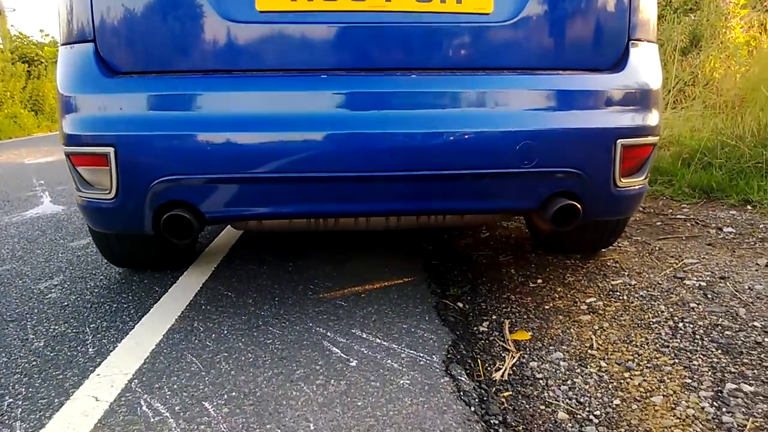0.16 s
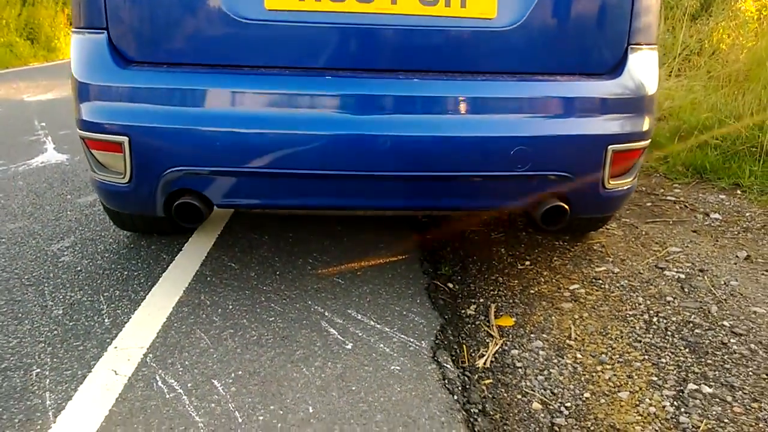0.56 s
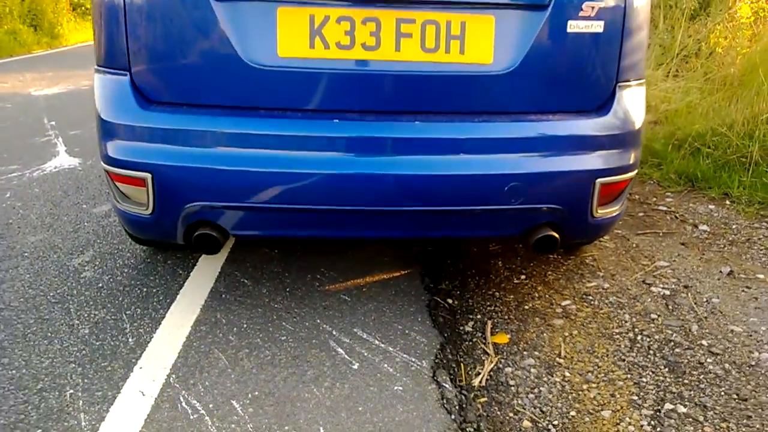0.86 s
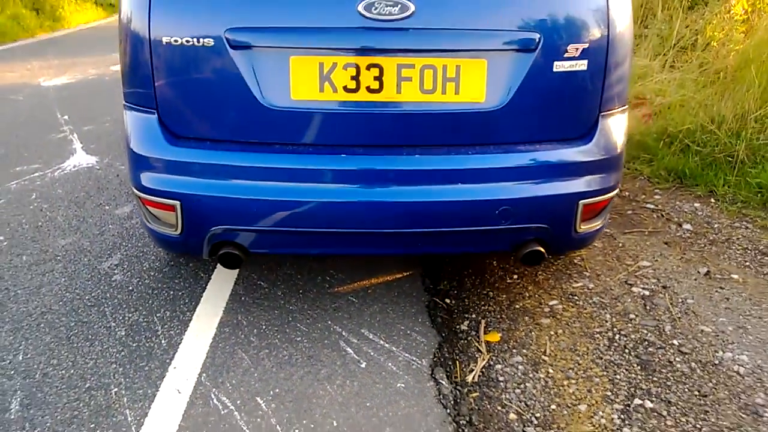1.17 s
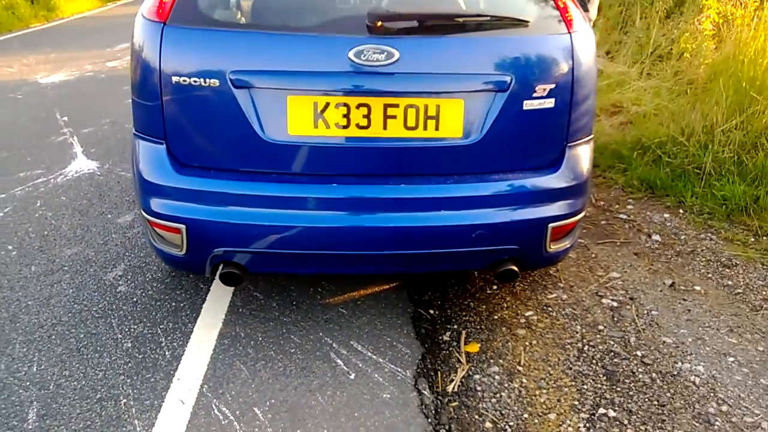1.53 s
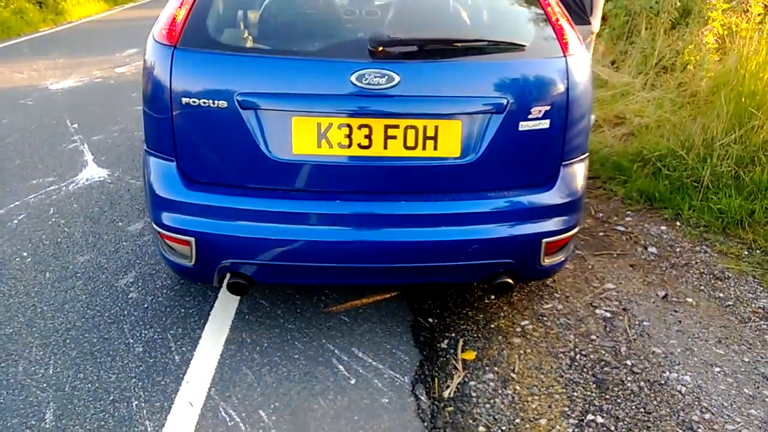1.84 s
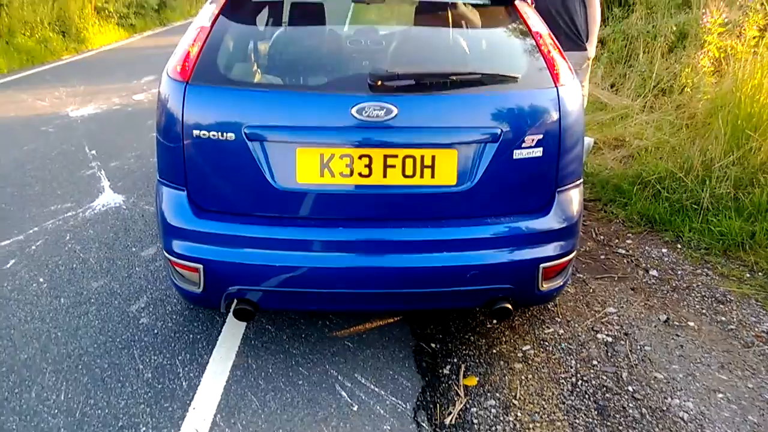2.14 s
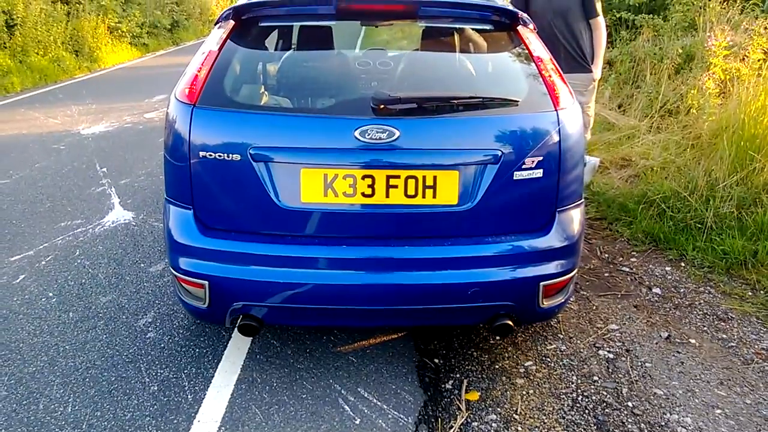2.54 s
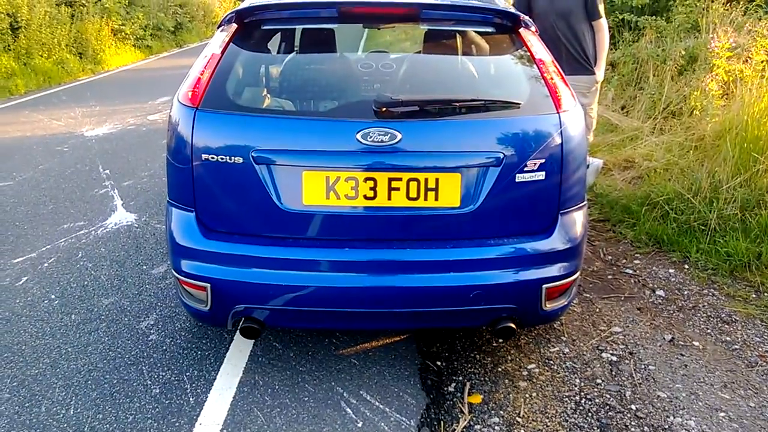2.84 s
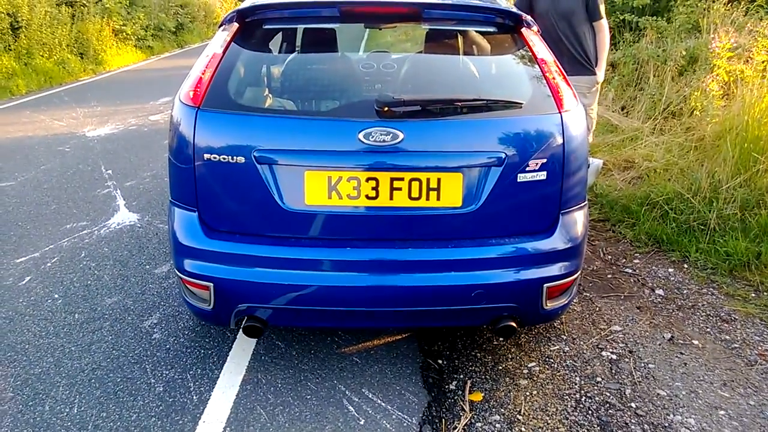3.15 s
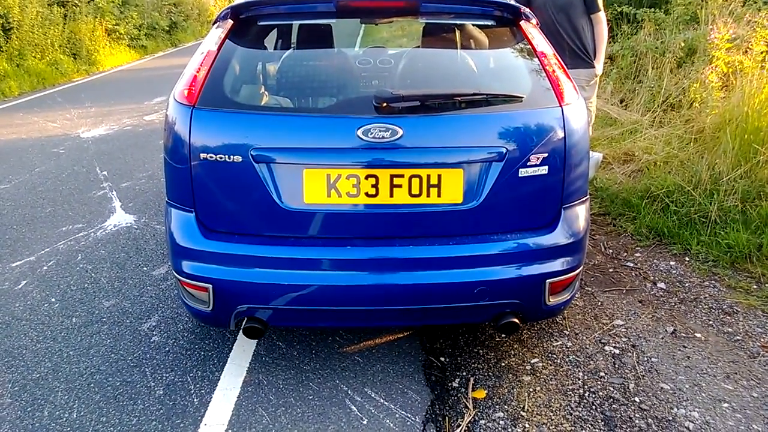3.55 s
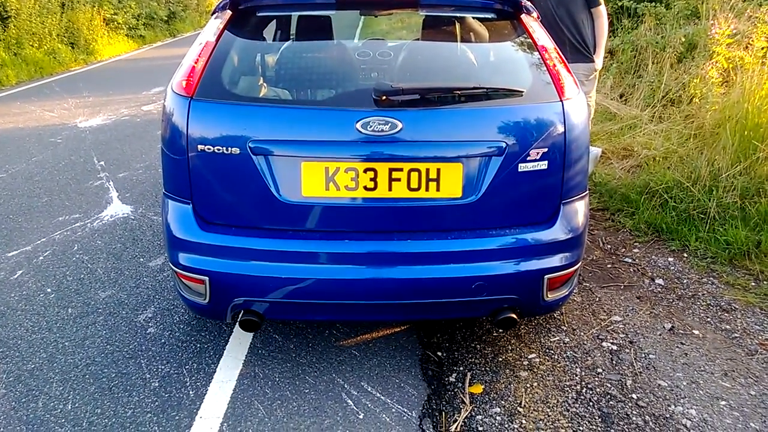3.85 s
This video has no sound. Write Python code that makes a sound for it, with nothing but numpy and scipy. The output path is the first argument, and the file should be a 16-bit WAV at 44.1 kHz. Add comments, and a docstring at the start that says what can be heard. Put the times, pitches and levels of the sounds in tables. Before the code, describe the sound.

Car engine falls from high revs with exhaust crackles and pops, settles to idle, then blips again

```python
"""Beside a country road, a five-cylinder car engine coasts down from high speed with the throttle shut.
Clean tones follow its firing rate; each firing also sends a rasping pulse and puff through the pipe.
Unburnt fuel booms as a low tone and pops as ragged bursts that ring the pipe and return from its end.
The engine drops to idle, then is blipped again. Shaped noise makes the gas hiss at the tail pipes
and the far traffic; one distant bird note is built from overtones near a throat resonance."""
import sys
import numpy as np
from scipy import signal
from scipy.fft import rfft, irfft
from scipy.io import wavfile
from scipy.ndimage import uniform_filter1d

SR = 44100
rng = np.random.default_rng(int(sys.argv[2]) if len(sys.argv) > 2 else 0)


def volts(x):
    """Linear amplitude factor 10**(x/20) for a level x in dB, scalar or array-like."""
    e = np.asarray(x, float) / 20
    return 10 ** e


def wav_record(signal):
    """Record a signal, one row per channel, as 16-bit PCM in the file named by sys.argv[1]."""
    frames = np.transpose(np.atleast_2d(signal))
    bounded = np.clip(frames, -1, 1)
    # unit amplitude maps onto the largest positive 16-bit level
    quanta = np.round(bounded * 32767).astype(np.int16)
    wavfile.write(sys.argv[1], SR, quanta)


N = 176400

# Engine run. Each row: time in seconds, firings per second, mean level of the firing tone in dB.
ENGINE_RUN = [(0, 172, -36), (.19, 164, -25), (.26, 161, -38), (.35, 157, -38), (.42, 153, -21),
              (.62, 145.2, -30), (.73, 140.6, -25), (.96, 132, -34), (1.27, 119, -39), (2.35, 72, -40),
              (2.68, 57, -38), (2.87, 51.2, -28), (3.31, 42, -45), (3.54, 42, -46), (3.72, 51.6, -27),
              (3.82, 61, -20), (3.92, 70, -21), (4, 70.4, -22)]
CYLINDERS = 5
MID_SPEED_HZ = 110  # firings per second at which the pipe balance is stated

# Tones beside the firing tone. Each row: multiple of the engine cycle rate, then level in dB
# relative to the firing tone when fast, at a blip and at idle.
CYCLE_TONES = [(2, -8, -5, -28.5), (8, -20, -42.5, -38), (10, -25, -13.5, -23.5), (12, -22, -49, -33.5),
               (14, -16, -35.5, -34.5), (15, -25.5, -30.5, -32), (20, -30, -19.5, -36.5)]
# Firings per second at idle, at a blip and when fast, in one row.
TONE_SPEEDS_HZ = [54, 68, 165]
TONE_WOBBLE_DB = 0.7
MISFIRE_LOSS_DB = -10.5  # these tones blur away while the exhaust booms

# Gas column booming on unburnt fuel. Each row: time in seconds, level of its lowest tone in dB.
BOOM_LEVEL = [(.2, -42), (.23, -23), (.35, -35), (.4, -20.5), (.45, -37), (.64, -27.5), (.71, -18.5),
              (.79, -34), (0.83, -17.5), (.9, -26.5), (.93, -32.5), (1, -18), (1.031, -66), (1.051, -22.5),
              (1.29, -39), (1.318, -27), (1.47, -20), (1.502, -53.5), (1.59, -17), (1.66, -30),
              (1.709, -19), (1.742, -34), (1.779, -19), (1.83, -39), (1.93, -24.5), (2.031, -37),
              (2.08, -21), (2.12, -31), (2.24, -22), (2.41, -32), (2.47, -18.5), (2.538, -36),
              (2.59, -23.5), (2.67, -36.5), (2.721, -40.5)]
# Centre of the boom's wandering pitch. Each row: time in seconds, frequency in Hz.
BOOM_PITCH = [(.2, 56.2), (.65, 65.05), (1.34, 56), (1.74, 52.56), (2.5, 58.6), (2.7, 55.62)]
BOOM_WANDER, BOOM_OVERTONE_DB = 0.0424, -15.5  # wander as a share of the pitch

# Pipe and silencer resonances. Each row: frequency in Hz, width in Hz, ringing level in dB at mid speed,
# dB gained per octave of engine speed.
PIPE_RESONANCES = [(134.9, 12.2, 10, -2.5), (258.3, 16, 1.05, -6), (372.8, 18.4, 2, 2), (481, 105, -6, 8),
                   (934, 75, -9, 1), (725.9, 8.2, -9.5, 2), (956.5, 50.4, -3.5, 5), (1333, 86, -11.5, 18.5),
                   (1526, 100, -14.5, 18.5), (1828, 132, -8.5, -1), (2230, 57, -18.5, -0.5),
                   (2966, 180, -23, -5.5), (3604, 170, -18.5, 2.5), (3965, 470, -19.5, 4.5)]
# Band in which the pipe is deaf: lower and upper edge in Hz.
DEAF_BAND_HZ = [588, 627]

# Uneven burning and gas flow. Each row: time in seconds, rasp in dB before it follows the boom,
# mean hiss level in dB.
GAS_FLOW = [(0, -37, -52.5), (.3, -36, -55.5), (.45, -29, -56), (1.05, -32, -61), (1.9, -37.5, -77),
            (2.6, -42, -107.5), (2.8, -55.5, -100), (3.6, -58.5, -104), (3.8, -39.5, -70),
            (4, -35.5, -64.5)]
RASP_FOLLOWS_BOOM = 0.15  # dB of rasp per dB of boom
BURN_SCATTER_DB, RASP_NOISE = 1, 7.46  # scatter between firings; puff noise against the firing pulse
POPS_TAKE_DB = -2  # while the exhaust booms, the upper rasp gives way to the pops
STEADY_BURN_DB = -4.5  # the low rasp is weaker while the fast engine burns evenly

# Pops of ragged burning. Each row: time in seconds, drive level in dB before scatter and the pipe.
POP_BURSTS = [(0.363, -34.5), (0.397, -32.5), (0.418, -46), (0.483, -24.5), (0.526, -28), (0.591, -27),
              (0.655, -27.5), (0.714, -22), (0.893, -25.5), (0.933, -28.5), (0.973, -30.5), (0.996, -25.5),
              (1.046, -34.5), (1.065, -28), (1.119, -33), (1.136, -29), (1.204, -26.5), (1.314, -25.5),
              (1.348, -32), (1.406, -53), (1.443, -29.5), (1.462, -29), (1.589, -30.5), (1.749, -33.5),
              (1.792, -34), (1.942, -37.5), (2.066, -32), (2.142, -40), (2.183, -37.5), (2.223, -36),
              (2.366, -30.5), (2.556, -32), (3.918, -30.5)]
POP_SCATTER_DB, BURN_S, RAGGED = 3, 0.005, 0.61
POP_LOW_CUT_HZ, POP_TOP_HZ = 670, 2260
# Bright spits of gas from the tail pipes. Each row: time in seconds, drive level in dB before halving.
GAS_SPITS = [(0.4877, -37.5), (0.5913, -42), (0.7302, -57), (0.8841, -45.5), (1.316, -47), (1.4054, -49),
             (1.462, -47.5), (1.5918, -51.5), (1.7105, -52), (2.2242, -57.5), (2.5694, -65),
             (3.9185, -45.5)]
PUFF_S = 0.0058
SNAP_HZ, SNAP_WIDTH_HZ, SNAP_DB = 3950, 290, -2  # the tail pipe tips colour each spit, more at speed
ECHO_S, ECHO_LOSS_DB = 0.0145, 6.5  # delay and loss of each return

# Colour of the escaping gas. Each row: frequency in Hz, relative density in dB per Hz.
GAS_SPECTRUM = [(3000, 0.5), (4400, -0.5), (5200, -10.5), (8500, -8), (11500, -13.5), (13500, -18.5),
                (15700, -33.5)]
HISS_GATE = 0.064  # depth of the pulsing

# Colour of the far traffic. Each row: frequency in Hz, relative density in dB per Hz.
TRAFFIC_SPECTRUM = [(60, -4), (269, -40.5), (950, -37), (2000, -49), (3740, -64), (4750, -64),
                    (15000, -83.5)]
TRAFFIC_DB = -47

# Distant harsh bird. Each row: start in seconds, length in seconds, start pitch in Hz, end pitch in Hz,
# level in dB of an overtone right on the throat resonance.
BIRD_NOTES = [(3.292, 0.13, 267, 298, -72.5)]
BIRD_THROAT_HZ, BIRD_WIDTH_HZ = 2430, 260


def tones(rate, level_db, booming):
    """The firing tone and other clean multiples of the engine cycle; their balance follows speed."""
    cycle = 2 * np.pi * np.cumsum(rate) / SR / CYLINDERS
    others = 0
    for multiple, *fast_to_idle_db in CYCLE_TONES:
        balance_db = np.interp(rate, TONE_SPEEDS_HZ, fast_to_idle_db[::-1])
        wobble_db = TONE_WOBBLE_DB * drift(5.3)
        others = others + volts(balance_db + wobble_db) * np.sin(round(multiple) * cycle)
    # the firing tone wobbles more, and most while the exhaust booms
    firing = volts(TONE_WOBBLE_DB * (2 + 2 * booming) * drift(17)) * np.sin(CYLINDERS * cycle)
    return np.sqrt(2) * volts(level_db) * (firing + volts(MISFIRE_LOSS_DB * booming) * others)


def boom(level_db, booming):
    """The lowest pipe resonance swings up with each rich burn, with one overtone an octave above."""
    hz = in_time(BOOM_PITCH)[0] * (1 + BOOM_WANDER * drift(10.3))
    phase = 2 * np.pi * np.cumsum(hz) / SR
    wave = np.sin(phase) + volts(BOOM_OVERTONE_DB) * np.cos(2 * phase)
    return booming * np.sqrt(2) * volts(level_db) * wave


def rasp(rate, level_db, booming):
    """Each firing sends a pulse and a noisy, dying puff through the pipe."""
    turns = np.cumsum(rate) / SR  # firings so far
    count = turns.astype(int)
    strength = volts(BURN_SCATTER_DB * booming * rng.standard_normal(N)[count])
    pulse = np.diff(count, prepend=0) * np.sqrt(SR / rate)
    puff = RASP_NOISE * rng.standard_normal(N) * np.exp(-0.9 * (turns % 1))
    drive = strength * (pulse + puff)
    drives = []
    for hz, width_hz, *_ in PIPE_RESONANCES:
        flicker_db = (2.5 + 1.7 * booming) * drift(19.4)
        if hz > POP_LOW_CUT_HZ:
            loss_db = POPS_TAKE_DB * booming
        else:
            loss_db = STEADY_BURN_DB * (1 - booming) * (rate > MID_SPEED_HZ)
        drives.append(drive * np.sqrt(width_hz) * volts(flicker_db + loss_db))
    out = pipe(drives, rate)
    out = signal.lfilter(*signal.butter(1, DEAF_BAND_HZ, "bandstop", fs=SR), out)
    running_rms = np.sqrt(uniform_filter1d(out ** 2, size=12000))
    return volts(level_db) * out / running_rms


def pops(rate):
    """Ragged burns ring the upper pipe; burns and gas spits return from its far end three times."""
    out = ragged_burns(rate) + spits(rate)
    lag = int(ECHO_S * SR)
    return sum(volts(-ECHO_LOSS_DB * k) * np.pad(out, (k * lag, 0))[:N] for k in range(4))


def ragged_burns(rate):
    """A click and noise under a short burst excite each pipe resonance by a different chance."""
    s, db = np.transpose(POP_BURSTS)
    at = (s * SR).astype(int)
    chance = rng.standard_normal((len(s), len(PIPE_RESONANCES)))
    flame = RAGGED * rng.standard_normal(N) / np.sqrt(BURN_S * SR)
    flame[at + int(BURN_S * SR / 4)] = 1
    drives = [flame * decays(at, volts(db + POP_SCATTER_DB * c), BURN_S / 2) for c in chance.T]
    band = signal.butter(2, [POP_LOW_CUT_HZ, POP_TOP_HZ], "band", fs=SR, output="sos")
    return signal.sosfilt(band, pipe(drives, rate))


def spits(rate):
    """Short bursts of gas noise, with a resonance of the tail pipe tips that grows with speed."""
    gas = coloured(rng.standard_normal(N), GAS_SPECTRUM)
    snap = rms_one(resonate(gas, SNAP_HZ, SNAP_WIDTH_HZ))
    s, db = np.transpose(GAS_SPITS)
    bursts = decays((s * SR).astype(int), volts(db), PUFF_S / 2)
    return bursts * (gas + volts(SNAP_DB) * (rate / MID_SPEED_HZ) ** 2 * snap) / 2


def pipe(drives, rate):
    """Each resonance rings with its own drive; the balance shifts with engine speed."""
    octaves = np.log2(rate / MID_SPEED_HZ)
    out, sign = 0, 1
    for drive, (hz, width_hz, db, slope_db) in zip(drives, PIPE_RESONANCES):
        out = out + sign * volts(db + slope_db * octaves) * resonate(drive, hz, width_hz)
        sign = -sign  # neighbours ring in opposite polarity
    return out


def hiss(rate, level_db):
    """Gas rushing from the tail pipes, pulsing with the firings."""
    gate = 1 + HISS_GATE * np.sin(2 * np.pi * np.cumsum(rate) / SR)
    gas = rng.standard_normal(N) * gate * volts(1.1 * drift(15))
    return volts(level_db) * coloured(gas, GAS_SPECTRUM)


def far_traffic():
    """Distant traffic as low, slightly unsteady noise."""
    return volts(TRAFFIC_DB + 0.5 * drift(12)) * coloured(rng.standard_normal(N), TRAFFIC_SPECTRUM)


def birds():
    """A harsh note far off: gliding overtones, strongest near the throat resonance."""
    out = 0
    for start_s, length_s, start_hz, end_hz, db in BIRD_NOTES:
        shape, share = swell(start_s, length_s)
        hz = start_hz + (end_hz - start_hz) * share ** 2
        phase = 2 * np.pi * np.cumsum(hz) / SR
        for k in range(6, 13):
            throat = np.exp(-((k * hz - BIRD_THROAT_HZ) / BIRD_WIDTH_HZ) ** 2)
            out = out + volts(db) * shape * throat * np.sin(k * phase)
    return out


def rms_one(x):
    """Scale to unit rms."""
    return x / np.sqrt(np.mean(x ** 2) + 1e-20)


def in_time(rows, outside=None):
    """Columns joined by straight lines in time."""
    s, *columns = np.transpose(rows)
    return [np.interp(np.arange(N) / SR, s, c, outside, outside) for c in columns]


def drift(rate_hz):
    """Slow chance of spread 1: noise through a double low-pass, drawn at every 40th sample."""
    r = np.exp(-80 * np.pi * rate_hz / SR)
    slow = signal.lfilter([1], [1, -2 * r, r * r], rng.standard_normal(N // 40 + 2002))[2000:]
    return np.interp(np.arange(N) / 40, np.arange(len(slow)), rms_one(slow))


def resonate(x, hz, width_hz):
    """Two-pole resonance; a unit click rings from a height of about 1."""
    r = np.exp(-np.pi * max(width_hz, 2) / SR)
    w = 2 * np.pi * hz / SR
    return signal.lfilter([0, np.sin(w)], [1, -2 * r * np.cos(w), r * r], x + 1e-18)


def coloured(x, spectrum):
    """Give white sound a spectrum; rms 1."""
    hz, db = np.transpose(spectrum)
    f = np.maximum(np.arange(N // 2 + 1) * SR / N, 1)
    gain = volts(np.interp(np.log(f), np.log(hz), db))
    return rms_one(irfft(rfft(x) * gain, N))


def swell(start_s, length_s):
    """A smooth rise and fall, and the share of the note that has passed."""
    share = np.clip((np.arange(N) / SR - start_s) / length_s, 0, 1)
    return np.sin(np.pi * share), share


def decays(at, sizes, length_s):
    """A quick rise and a fall from each given sample, peaking after length_s."""
    marks, r = np.zeros(N), np.exp(-1 / (length_s * SR))
    marks[at] = sizes
    return signal.lfilter([np.e * (1 - r)], [1, -2 * r, r * r], marks + 1e-18)


def scene():
    """Engine, exhaust and roadside on one channel."""
    rate, tone_db = in_time(ENGINE_RUN)
    rasp_db, hiss_db = in_time(GAS_FLOW)
    boom_db, = in_time(BOOM_LEVEL)
    # 1 from the first boom row to the last, 0 elsewhere, with softened edges
    span = [(BOOM_LEVEL[0][0], 1), (BOOM_LEVEL[-1][0], 1)]
    booming = uniform_filter1d(in_time(span, 0)[0], size=900)
    mean_boom_db = np.mean(np.array(BOOM_LEVEL)[:, 1])
    rasp_db = rasp_db + RASP_FOLLOWS_BOOM * booming * (boom_db - mean_boom_db)
    engine = tones(rate, tone_db, booming)
    exhaust = boom(boom_db, booming) + rasp(rate, rasp_db, booming) + pops(rate) + hiss(rate, hiss_db)
    return (engine + exhaust + far_traffic() + birds())[None]


def band_limit(x):
    """A steep low-pass at the top of the band."""
    return signal.sosfilt(signal.butter(12, 15750, fs=SR, output="sos"), x)


def record(dry):
    """The microphone at the roadside loses the deepest bass."""
    bass_cut = signal.butter(3, 36, "high", fs=SR, output="sos")
    mix = signal.sosfilt(bass_cut, dry)
    return band_limit(mix)


dry = scene()
out = record(dry)
wav_record(out)
```